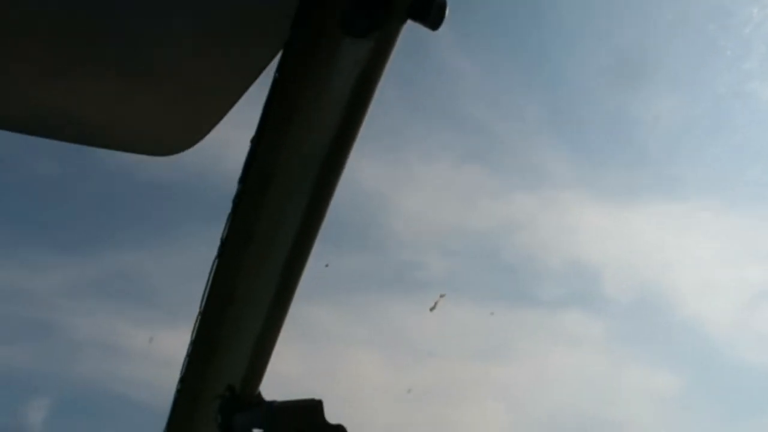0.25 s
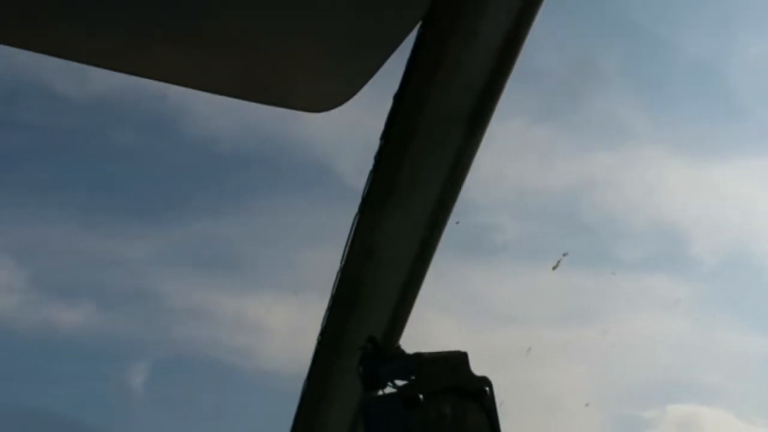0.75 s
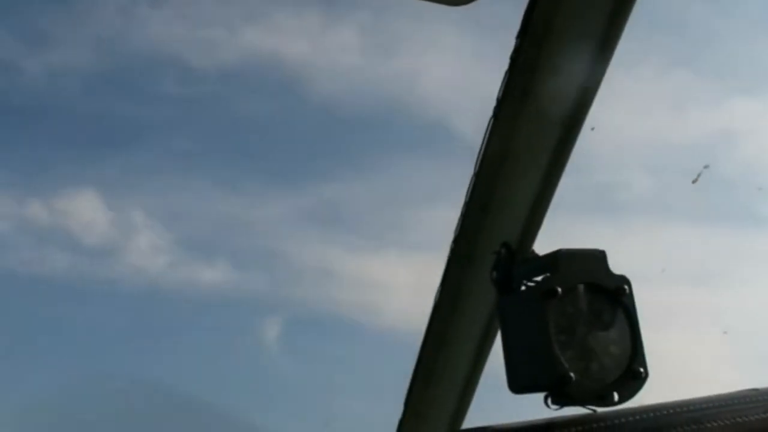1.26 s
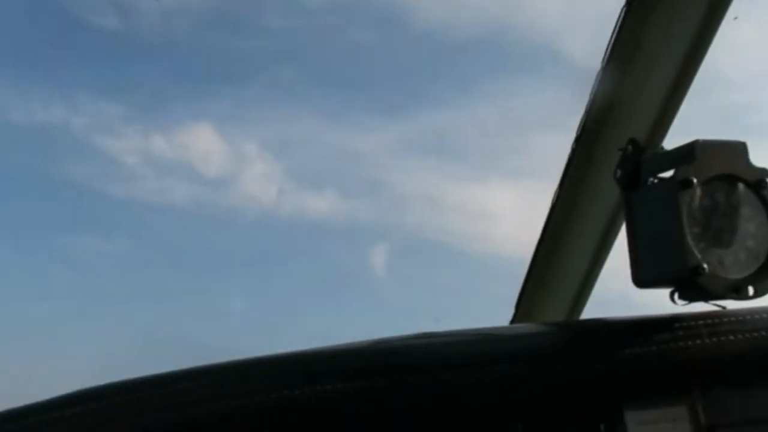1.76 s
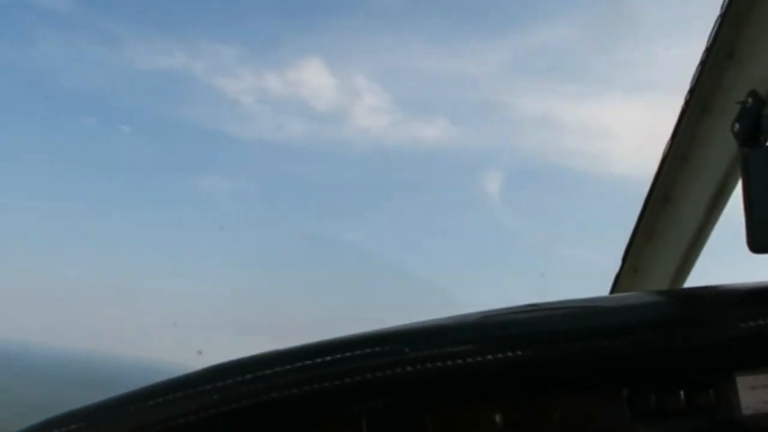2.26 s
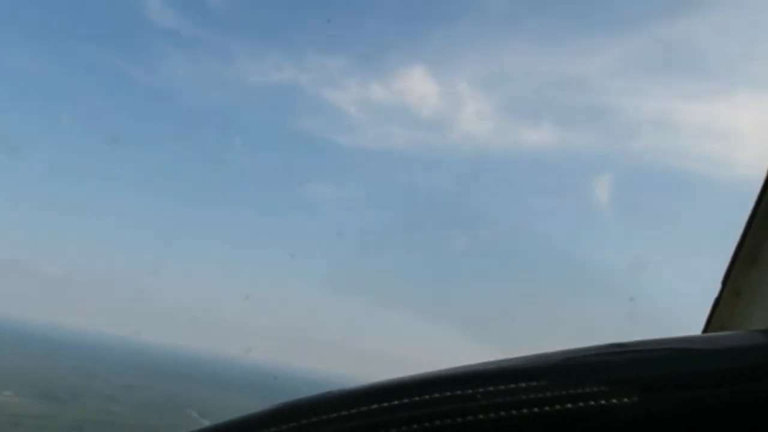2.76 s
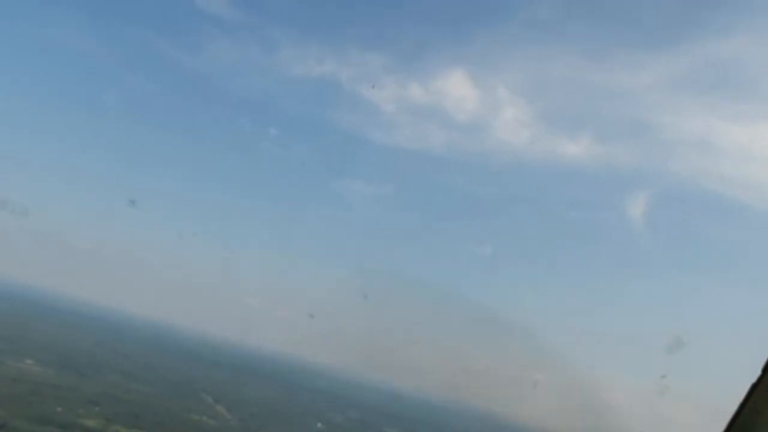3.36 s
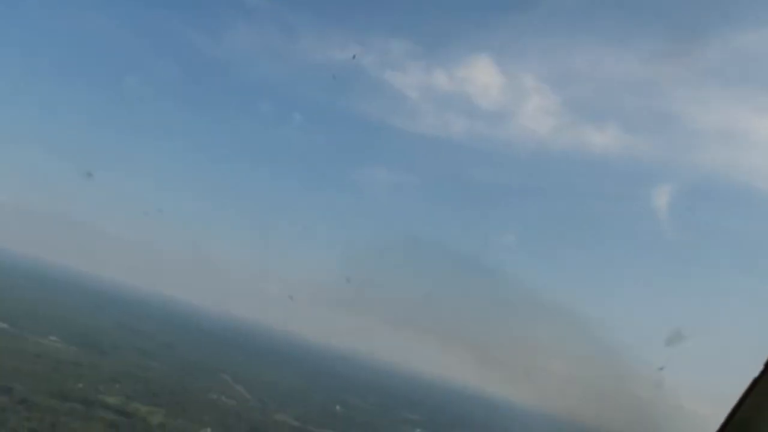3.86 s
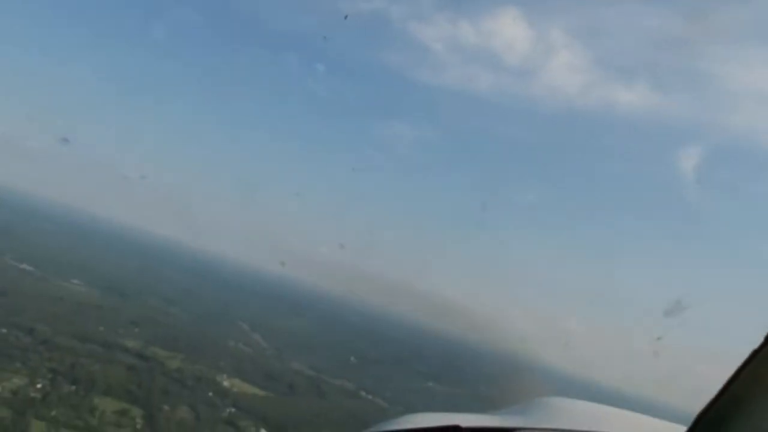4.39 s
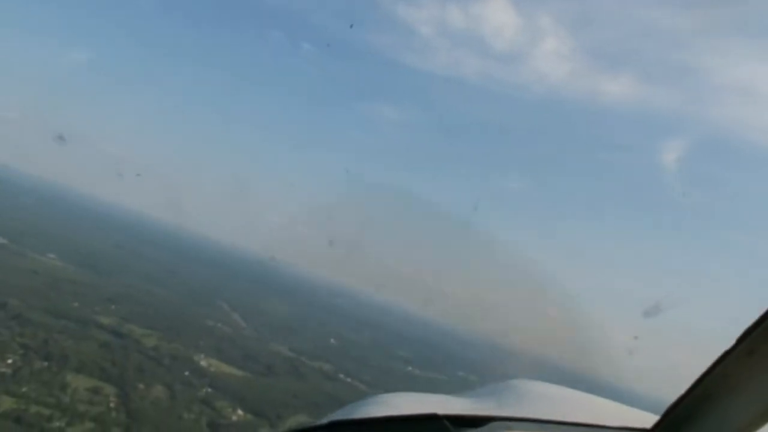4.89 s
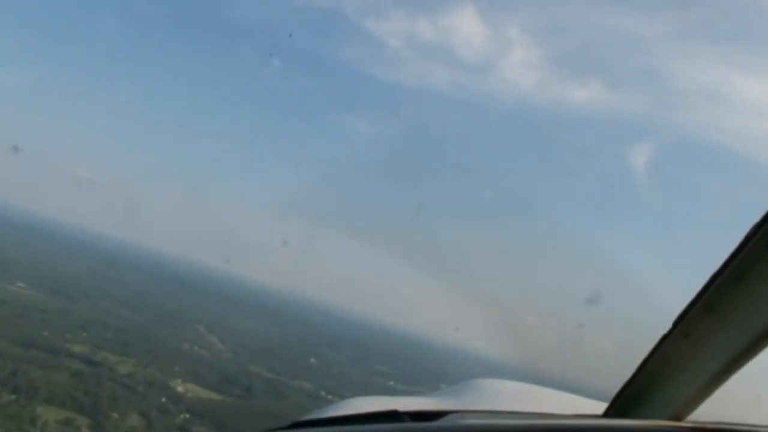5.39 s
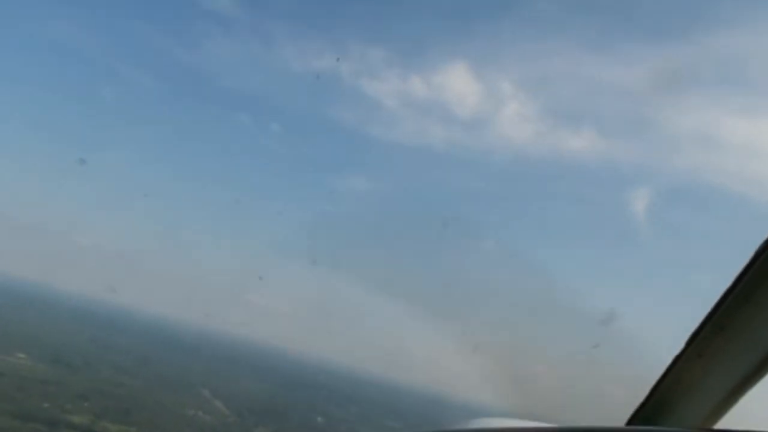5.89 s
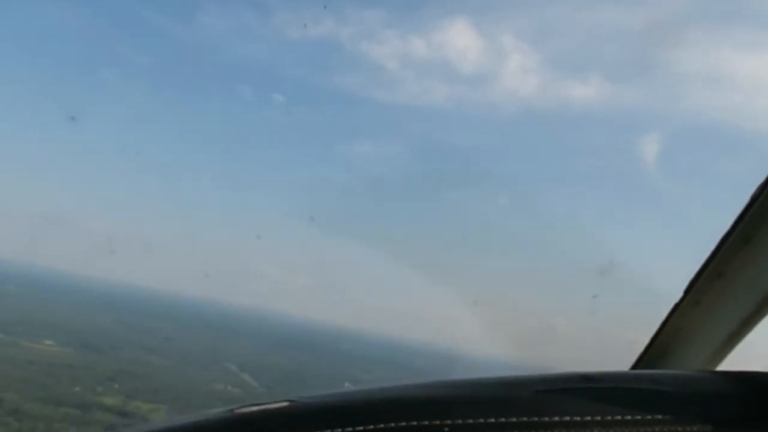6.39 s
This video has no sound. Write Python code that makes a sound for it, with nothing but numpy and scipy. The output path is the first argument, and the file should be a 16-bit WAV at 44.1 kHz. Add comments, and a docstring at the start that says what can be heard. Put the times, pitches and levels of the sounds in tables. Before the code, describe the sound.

A continuous low engine drone fills a light aircraft cabin, its fast pulses blending into a thick hum with a slightly uneven chug. Around it lie a fluttering exhaust rasp, weak panel buzz, wavering low boom, broad slipstream rush and soft wide hiss. The tone shifts slightly midway, and a faint high whine appears late. Heard close, in stereo, with no break.

```python
"""A four-cylinder engine and its propeller drone at a nearly even speed, heard in a small plane's cockpit in cruise.
The drone sums crankshaft orders; noise puffs give the exhaust and wavering lines the buzzing panels.
Shaped noise gives turbulence booming in the cabin, the slipstream over the windscreen and a wide hiss.
A thin whine, made of wavering tones, comes in near the end. A close pair of microphones hears it all."""
import sys
import numpy as np
from scipy import signal
from scipy.fft import rfft, irfft
from scipy.io import wavfile
from scipy.ndimage import uniform_filter1d, map_coordinates

SR = 44100
rng = np.random.default_rng(int(sys.argv[2]) if len(sys.argv) > 2 else 0)


def int16_out(signal):
    """Quantize to a 16-bit WAV file."""
    q = np.round(np.clip(np.atleast_2d(signal).T, -1, 1) * 32767)
    wavfile.write(sys.argv[1], SR, q.astype(np.int16))


N = 292824
TIME = np.arange(N) / SR

# crankshaft speed: time_s, turns_per_s
SPEED = [(0, 37.871), (0.5, 37.86), (0.8, 37.909), (1.4, 37.987), (2, 38.05), (2.6, 38.107), (3.2, 38.079),
         (3.8, 38.179), (4.4, 38.17), (5, 38.141), (5.6, 38.086), (6.2, 37.995), (6.64, 37.995)]
# engine lines before swells; even orders are firings and blade passes, the rest come from unequal cylinders:
# multiple of crank speed, side_db (rms, from the side window), ahead_db (rms, from ahead)
ORDERS = [(1, -32.5, -32), (1.5, -46, -48), (2, -20, -20), (2.5, -38, -37), (3, -32, -34), (3.5, -39, -40),
          (4, -20.5, -20.5), (4.5, -39, -40), (5, -39, -43), (5.5, -46, -36), (6, -22, -22),
          (6.5, -40, -43), (7, -44, -38), (7.5, -69, -49), (8, -46.5, -41.5), (8.5, -49, -51),
          (9, -45, -43.5), (10, -34.5, -34), (10.5, -42.5, -47), (11, -38, -38.5), (11.5, -52, -41),
          (12, -38.5, -39.5), (12.5, -50, -39.5), (13, -56, -41.5), (14, -54, -56), (14.5, -54, -46),
          (15, -51, -57), (16, -46.5, -60), (16.5, -69, -60), (17, -52, -52), (17.5, -48.5, -51),
          (18, -49.5, -48.5), (18.5, -51, -46.5), (19, -54, -54), (19.5, -47, -55), (20, -57, -56),
          (20.5, -57, -51), (21, -50, -48), (21.5, -51.5, -46), (22, -50.5, -48), (22.5, -57, -62),
          (23.5, -71, -48), (26, -58, -53.5), (27.5, -52, -51), (28, -52, -52)]
# swells of the upper engine lines and of the cabin roar: time_s, growl_db, roar_db
GROWL = [(0, 1, 0.5), (.5, 0, 1.5), (1.2, -1, -2), (1.32, 1, 0.5), (1.42, -3.5, -4), (2.1, -1.5, -0.6),
         (2.9, -2.5, -1), (3.6, -1, -0.1), (4.9, -0.5, 3), (5.1, -1, 1), (5.5, 0, 2), (6.2, -2.5, 2.2),
         (6.6, -0.5, 4.5)]


def gain_of(db):
    """Decibels to amplitude gain."""
    return 10 ** (np.asarray(db) / 20)


def evened(x):
    """Scales x to rms 1."""
    return x / np.sqrt(np.mean(abs(x) ** 2) + 1e-20)


def read(points, hz):
    """A spectrum's value at hz, interpolated on a log-frequency axis."""
    f, value = np.transpose(points)
    return np.interp(np.log(hz + 1), np.log(f + 1), value)


def follow(rows, t, column=1):
    """One column of a curve at the times t."""
    rows = np.asarray(rows)
    return np.interp(t, rows[:, 0], rows[:, column])


def within(t, start_s, end_s, ease_s):
    """Gate from 0 to 1 with linear ramps of ease_s, centred on start_s and end_s."""
    return np.clip(.5 + np.minimum(t - start_s, end_s - t) / ease_s, 0, 1)


def wander(rate_hz, size=2048):
    """Slow complex random signal of rms 1, its spectrum falling above rate_hz."""
    hz = np.fft.fftfreq(size, N / SR / size)
    draws = rng.standard_normal(size) + 1j * rng.standard_normal(size)
    slow = np.fft.ifft(draws / (1 + (hz / rate_hz) ** 2))
    return np.interp(TIME, np.linspace(0, N / SR, size), evened(slow))


def coloured(x, spectrum):
    """Filters x by a spectrum in dB."""
    return irfft(rfft(x) * gain_of(read(spectrum, np.fft.rfftfreq(N, 1 / SR))), N)


def noise(spectrum):
    """Gaussian noise with the given density in dB per Hz."""
    return coloured(rng.standard_normal(N), spectrum) * np.sqrt(SR / 2)


def facing(t):
    """0 while the microphones face the side window, 1 once they have turned ahead."""
    turn_middle_s, turn_length_s = 3.16, 0.56
    return np.clip(.5 + (t - turn_middle_s) / turn_length_s, 0, 1)


def airflow(t):
    """Strength of the airflow over the cabin at the times t, in dB."""
    # time_s, level_db
    airflow_curve = [(0.0, -1.5), (.15, -1), (0.25, 2.5), (.33, -1), (.52, 1.3), (.8, 0), (1.2, 1),
                     (1.3, 0.5), (1.42, -1.7), (1.72, -1.5), (1.95, 1.5), (2.18, -1.8), (2.58, 2),
                     (2.88, 0), (3.15, 1.5), (3.3, -1.5), (3.82, -0.3), (3.95, -1.5), (4.15, 1),
                     (4.75, -0.5), (4.95, 0), (5.22, -1.8), (5.45, -1.1), (5.66, -2), (5.77, 2),
                     (5.88, -3.5), (6.15, -0.5), (6.37, -4), (6.64, -1.8)]
    return follow(airflow_curve, t)


def roar_db():
    """The cabin's roar follows the airflow and its own swells."""
    return follow(GROWL, TIME, column=2) + 0.73 * airflow(TIME)


def buffet(turns, gust_db=0.6, chop=0.031):
    """Quick random flutter and a blade-rate ripple shake the slipstream and the exhaust rasp."""
    blades = 1 + chop * np.cos(2 * np.pi * 2 * turns)
    return gain_of(gust_db * wander(32).real) * blades


def gusty(x, patch_db=0.75, ripple_db=1.8, ease_s=0.37, size=2048):
    """Airflow swells x; the windscreen colours it, with passing moans and drifting patches of turbulence."""
    # treble level: time_s, level_db
    treble_curve = [(0, 0.5), (.5, 0.5), (.85, -0.5), (1.32, 0), (1.42, -2.5), (2, -0.2), (2.2, -2.5),
                    (2.6, 0.5), (2.78, -1.7), (3.15, -0.5), (3.35, -2), (3.9, 0), (4.15, 0), (4.35, 0),
                    (4.63, -0.5), (4.75, -0.5), (4.97, 0.7), (5.08, -0.7), (5.45, -0.5), (5.58, 1),
                    (5.92, -1), (6.14, 1.5), (6.38, -1), (6.64, 1.5)]
    # level of the top treble, brightest at the end: time_s, level_db
    sheen_curve = [(0, 1.5), (1.4, 1.5), (6.1, -1), (6.45, 2.5), (6.64, 8)]
    # windscreen peaks and hollows: pitch_hz, width_hz, side_db, ahead_db
    windscreen_bands = [(1110, 47, 0, -4), (1646, 115, -1, 3.5), (2105, 71, 3, -1), (2450, 59, 1, 1.5),
                        (2676, 41, 2, -4), (2710, 50, -2, -1.5), (3600, 100, -2.5, 2)]
    # passing moans and dips: start_s, end_s, pitch_hz, width_hz, lift_db
    moan_bands = [(-0.5, 0.53, 620, 70, 4), (1, 1.2, 3750, 120, 4), (.3, 0.69, 1070, 68, 5.5),
                  (1.3, 2.34, 1730, 150, 4), (2.7, 3.66, 1280, 130, 2), (4.3, 5.15, 486, 54, 14),
                  (4, 5.1, 800, 76, 3), (3, 3.6, 1560, 300, 0.5), (1.3, 2.2, 665, 80, 5),
                  (-0.5, 0.77, 800, 97, -4), (7, 6.3, 3080, 200, -2.5), (5, 4.9, 3660, 90, 1),
                  (3, 5.2, 1250, 180, -1.7), (0.5, 0.37, 8300, 600, 3), (1, 1, 4300, 700, 1.7),
                  (0, 0.55, 1840, 150, 2.5)]

    hz, t, z = signal.stft(x, SR, nperseg=size, noverlap=size - size // 4)
    hz = hz[:, None]
    high = read([(2400, 0.11), (4000, 0.84)], hz)  # share that follows the treble curve
    db = (1 - high) * 0.88 * airflow(t) + high * follow(treble_curve, t)
    ahead = facing(t)
    for pitch_hz, width_hz, side_db, ahead_db in windscreen_bands:
        band = np.exp(-((hz - pitch_hz) / width_hz) ** 2)
        db = db + (side_db + ahead * (ahead_db - side_db)) * band
    for start_s, end_s, pitch_hz, width_hz, lift_db in moan_bands:
        band = np.exp(-((hz - pitch_hz) / width_hz) ** 2)
        db = db + lift_db * within(t, start_s, end_s, ease_s) * band
    db = db + follow(sheen_curve, t) * read([(7000, 0.065), (11500, 0.87), (14000, 0.7)], hz)
    patches = uniform_filter1d(rng.standard_normal(z.shape), size=14, axis=0)
    patches = uniform_filter1d(patches, size=7, axis=1)
    # a fine ripple over frequency that drifts slowly, as from cabin reflections
    ripple = uniform_filter1d(rng.standard_normal(z.shape), size=2, axis=0)
    ripple = uniform_filter1d(ripple, size=70, axis=1)
    db = db + patch_db * evened(patches) + ripple_db * evened(ripple)
    return signal.istft(z * gain_of(db), SR, nperseg=size, noverlap=size - size // 4)[1][:N]


def hiss():
    """Airy noise with the slipstream's slow swells and colouring."""
    # pitch_hz, density_db_per_hz (before swells)
    hiss_spectrum = [(1000, -94), (2500, -97), (4500, -90.5), (7000, -91), (9500, -97), (12200, -95.5),
                     (13500, -104), (15500, -115)]
    return gusty(noise(hiss_spectrum))


def slipstream(shake):
    """Air rushing over the windscreen: broadband noise, swelled by airflow, with flutter and blade-rate ripple."""
    # pitch_hz, density_db_per_hz (before swells)
    rush_spectrum = [(300, -74), (800, -65.5), (1200, -65), (1500, -68.5), (2050, -68), (2320, -70),
                     (2600, -67.5), (3300, -74), (4600, -80), (5600, -85.5), (7000, -88), (9200, -98),
                     (12200, -100), (14500, -116)]
    return shake * gusty(noise(rush_spectrum))


def whine(waver=0.93, blur_hz=28.0, ease_s=0.26):
    """A few thin, unsteady high tones that fade in and out."""
    # start_s, end_s, pitch_hz, level_db (rms before fades)
    whine_tones = [(4.6, 6.6, 2634, -56), (5.5, 6.02, 2630, -46.5), (6.35, 7, 5028, -68),
                   (6.35, 7, 7773, -66), (6.35, 7, 8882, -73)]
    out = np.zeros(N)
    for start_s, end_s, pitch_hz, level_db in whine_tones:
        tone = evened(1 + waver * wander(blur_hz)) * np.exp(2j * np.pi * pitch_hz * TIME)
        out += np.sqrt(2) * gain_of(level_db) * within(TIME, start_s, end_s, ease_s) * tone.real
    return out


def boom(turns, throb=0.014, lope=0.036):
    """Turbulence in the cabin's air resonances, pumped by each firing and once per two-turn cycle."""
    # pitch_hz, density_db_per_hz (before swells)
    boom_spectrum = [(10, -63), (22, -59), (31, -51), (45, -48), (90, -44.5), (122, -39), (150, -40.5),
                     (188, -49.5), (222, -44.5), (258, -52.5), (370, -56.5), (430, -60), (500, -63),
                     (820, -67), (1300, -107)]
    # swells of the deep boom: time_s, level_db
    surge_curve = [(0, -4), (.8, -2), (1.08, 4.5), (1.4, 3), (1.9, 3.5), (2.27, -4), (2.6, 5), (2.85, -9.5),
                   (3.1, 1.5), (3.38, -2), (3.68, 3.5), (3.95, 0.5), (4.27, 2), (4.85, -2.5), (5.15, 5),
                   (5.5, -3.5), (6.03, 1), (6.4, 0)]
    pump = 1 + throb * np.cos(2 * np.pi * 2 * turns) + lope * np.cos(np.pi * turns)
    air = noise(boom_spectrum) * evened(pump)
    deep = coloured(air, [(190, -7.0), (280, -8.5), (400, -27)])
    return deep * gain_of(follow(surge_curve, TIME)) + (air - deep) * gain_of(roar_db())


def buzz(turns, scatter_db=1.5, waver=0.48, count=60):
    """Panels answer the high whole and half orders absent from ORDERS with weak, wavering lines."""
    # pitch_hz, level_db (rms per line, before scatter and swells)
    buzz_spectrum = [(500, -59), (700, -56), (900, -65), (1070, -53), (1150, -65), (1250, -57.5),
                     (1650, -64)]
    out, crank_hz = np.zeros(N), np.mean(np.asarray(SPEED)[:, 1])
    strong = np.round(2 * np.asarray(ORDERS)[:, 0]) / 2
    for multiple in np.setdiff1d(13.5 + np.arange(count) / 2, strong):
        db = read(buzz_spectrum, multiple * crank_hz) + scatter_db * rng.standard_normal()
        phase_turns = multiple * turns + rng.random()
        line = evened(1 + waver * wander(0.89)) * np.exp(2j * np.pi * phase_turns)
        out += np.sqrt(2) * gain_of(db) * line.real
    return out * gain_of(roar_db())


def rasp(turns, level_db=-44.0, decay_strokes=0.55, delay_turns=0.022, sway=0.45):
    """Each exhaust stroke gives a decaying mid-range noise puff; one cylinder barks louder than the rest."""
    # exhaust puff strength in firing order: level_db
    cylinder_levels = [1.5, 1, 3, 4.5]
    strokes = 2 * (turns - delay_turns)
    cylinder = np.floor(strokes).astype(int) % len(cylinder_levels)
    force = gain_of(cylinder_levels)[cylinder]
    puffs = force * np.exp(-(strokes % 1) / decay_strokes) * rng.standard_normal(N)
    puffs = coloured(puffs, [(100, -8), (330, 2.0), (550, 3), (820, 2), (950, -10), (2500, -45), (6000, -86)])
    return evened(puffs) * gain_of(level_db + sway * roar_db())


def line_db(multiple):
    """Level of one order over time: firing tones and higher lines swell and sink."""
    # firing tones (orders 2, 4, 6): time_s, first_db, second_db, third_db
    firing_curves = [(0, 5, -1.5, 3), (0.15, -1.5, 1.5, 1.0), (0.35, -4, -3.5, -0.5), (0.6, 0.5, -3.5, 1.5),
                     (0.8, 1, -2.5, 3.5), (1, 2.5, 0.5, -4.5), (1.3, -0.5, 3, -0.5), (1.5, -1.5, -2, 0.5),
                     (1.95, -0.5, 1.5, 1.0), (2.25, -3, -3.5, -2), (2.55, 0.5, 0.0, 0.5), (2.9, -1, 0.0, 1),
                     (3.3, -1.5, 0, -1.5), (3.7, -2.5, 1, 1.5), (4.3, 1.0, -0.5, -2),
                     (4.55, -4.5, -1.5, 1.5), (4.8, -1.5, 1.5, 0), (5.1, -2, 2.5, -2), (5.35, 0.5, -2, 1.5),
                     (5.65, -0.5, -5.0, 1.5), (5.85, -0.5, 0.0, -0.5), (6.1, -1.5, 2.5, -1.5),
                     (6.35, -5, -2, -0.5), (6.64, -0.5, -2.0, -5.5)]
    # lifts and dips of higher lines: start_s, end_s, multiple of crank speed, lift_db
    node_spans = [(.7, 1.4, 10, 1.5), (1.95, 2.4, 10, -18), (3.2, 3.86, 10, -2), (5.87, 7, 10, 2),
                  (1.7, 2.9, 11, -9), (3.3, 5, 11, -7), (1.7, 3.1, 12, 1.5), (4.7, 5, 12, 1),
                  (5.8, 6.3, 12, -10), (4.2, 4.7, 21.5, 1), (5.5, 7, 21.5, 3), (5, 7, 20.5, -7),
                  (4.2, 4.8, 19.5, 5), (4.1, 5.3, 26, 7), (4.2, 4.8, 28, 2.5)]
    if multiple in (2, 4, 6):
        return follow(firing_curves, TIME, column=int(multiple / 2))
    db = follow(GROWL, TIME) * (multiple >= 10)
    for start_s, end_s, line, lift_db in node_spans:
        if np.round(2 * line) / 2 == multiple:
            db = db + lift_db * within(TIME, start_s, end_s, .35)
    return db


def stroke(multiple, turns):
    """Angle of one order: the lines add up to firing pulses, a low chug, a knock each turn and a bark each cycle."""
    knock_lag_turns, bark_lag_turns = .04, 1.53
    push = np.pi / 3  # each pulse is a push followed by a suck
    smear = rng.uniform(-np.pi, np.pi)  # the cabin's reflections smear the other lines
    if multiple in (2, 4, 6):
        return 2 * np.pi * multiple * turns + push
    if multiple < 9:
        return 2 * np.pi * multiple * turns - np.pi / 4 + smear / 8  # one cylinder fires off the beat
    if multiple <= 13:
        knock = 2 * np.pi * multiple * (turns - knock_lag_turns)
        return knock + push + np.pi * (multiple % 1) + smear / 6
    return 2 * np.pi * multiple * (turns - bark_lag_turns) + smear * 2 / 3


def drone(turns, firing_db=-0.25, uneven_burn=0.045, count=600):
    """Firing orders line up as one pulse per half turn, each of its own force; all orders flutter."""
    firing_flutter, uneven_flutter, upper_flutter = .05, .22, .09  # shares of line strength
    out, ahead = np.zeros(N), facing(TIME)
    force = 1 + uneven_burn * map_coordinates(rng.standard_normal(count), [2 * turns], order=3)
    for multiple, side_db, ahead_db in ORDERS:
        multiple = np.round(2 * multiple) / 2
        if multiple % 2 == 0:
            db, depth = firing_db, firing_flutter
        else:
            db, depth = 0., upper_flutter if multiple >= 10 else uneven_flutter
        line = (1 + depth * wander(10.5)) * np.exp(1j * stroke(multiple, turns))
        db = db + side_db + ahead * (ahead_db - side_db) + line_db(multiple)
        out += np.sqrt(2) * gain_of(db) * line.real
    return force * out


def microphones(x):
    """Two microphones at slightly different places in the cabin's standing waves: level and phase differ."""
    # pitch_hz, left_minus_right_db
    balance_curve = [(60, -.15), (150, .1), (200, 1.2), (260, 1.8), (310, 1.5), (390, 3), (470, 2),
                     (600, -.1), (1200, -.1)]
    # pitch_hz, left_lead_rad
    lead_curve = [(40, 0), (76, .07), (152, .19), (228, .3), (320, .35), (420, .05), (520, .2), (780, 0),
                  (5000, -.08)]
    hz = np.fft.rfftfreq(N, 1 / SR)
    half = gain_of(read(balance_curve, hz) / 2) * np.exp(1j * read(lead_curve, hz) / 2)
    return irfft(rfft(x) * np.array([half, 1 / half]), N)


def scene():
    """Engine, cabin and slipstream at the microphones, plus hiss and diffuse boom of opposite sign."""
    # share of the boom that differs between the microphones: pitch_hz, level_db
    diffuse_spectrum = [(50, -31), (110, -24), (250, -15.5), (500, -11.5), (1000, -20.5)]
    start_turns = .67  # crank position in its two-turn cycle
    turns = start_turns + np.cumsum(follow(SPEED, TIME)) / SR
    shake = buffet(turns)
    engine = drone(turns) + buzz(turns) + boom(turns) + shake * rasp(turns)
    middle = engine + slipstream(shake) + whine()
    side = hiss() + coloured(boom(turns), diffuse_spectrum)
    return microphones(middle) + np.array([side, -side])


def record(dry):
    """Fades both ends over 8 ms and low-passes the sound."""
    edge_hz = 15300
    ends = np.sin(np.pi / 2 * np.clip(np.minimum(TIME, TIME[-1] - TIME) / .008, 0, 1)) ** 2
    lowpass = signal.firwin(511, edge_hz, window=("kaiser", 9), fs=SR)
    return signal.oaconvolve(dry * ends, lowpass[None], "same")


dry = scene()
out = record(dry)
int16_out(out)
```